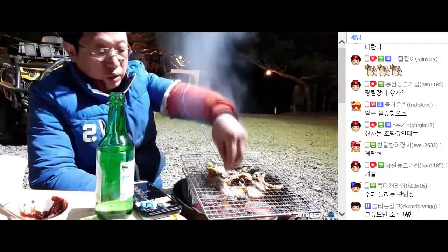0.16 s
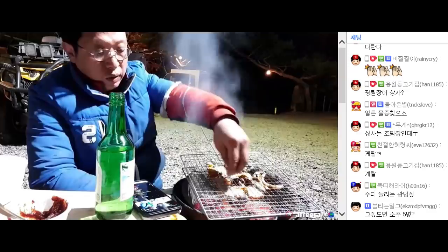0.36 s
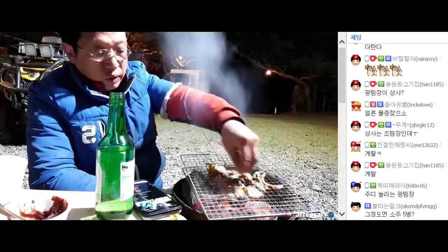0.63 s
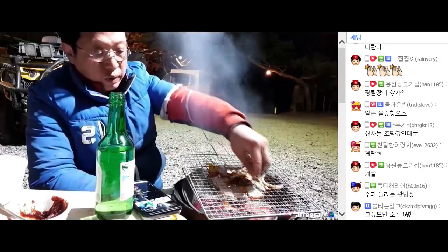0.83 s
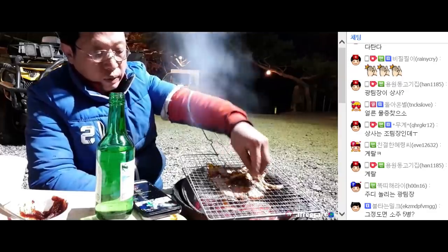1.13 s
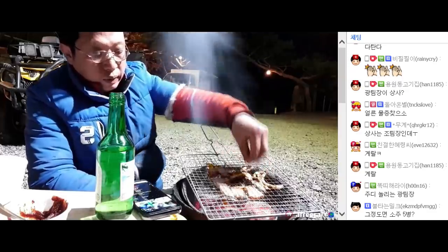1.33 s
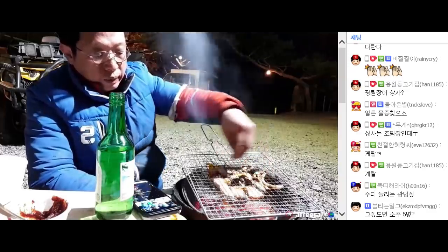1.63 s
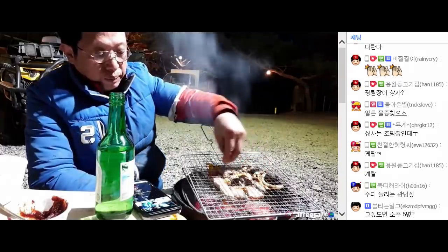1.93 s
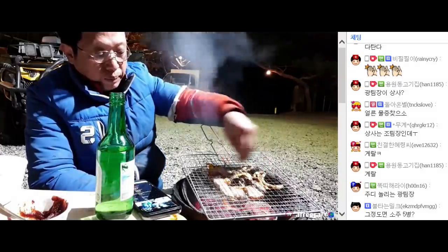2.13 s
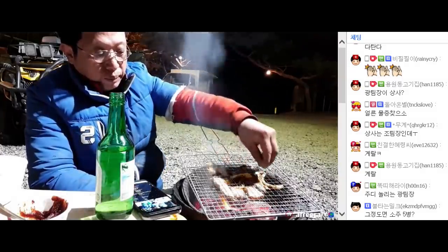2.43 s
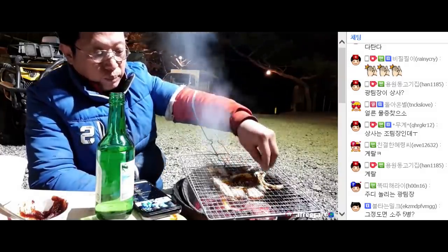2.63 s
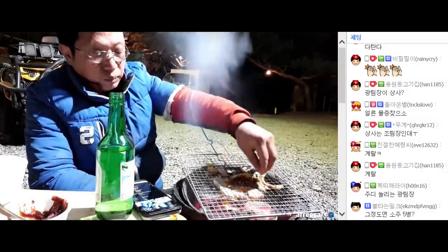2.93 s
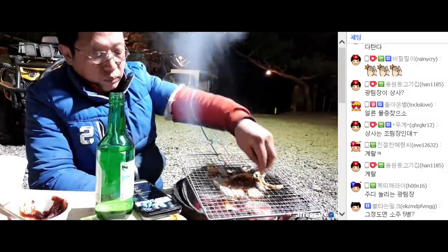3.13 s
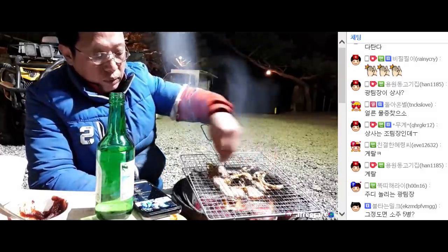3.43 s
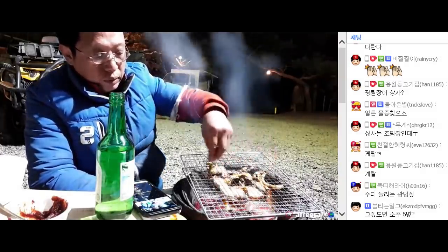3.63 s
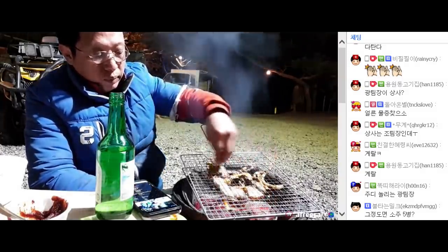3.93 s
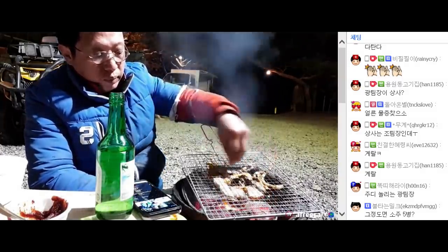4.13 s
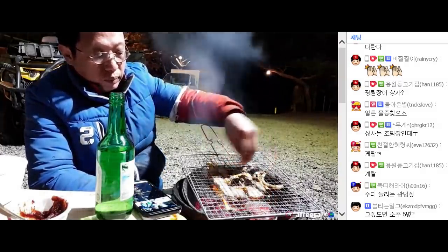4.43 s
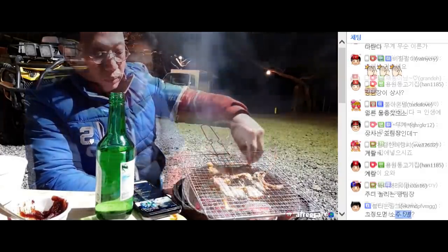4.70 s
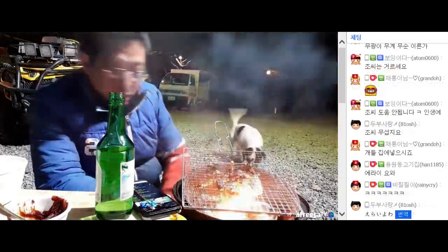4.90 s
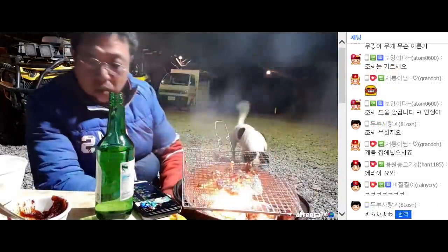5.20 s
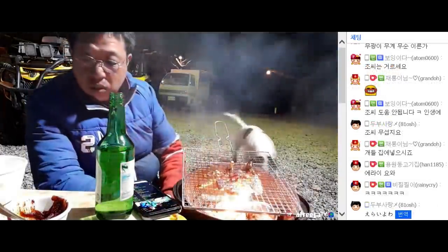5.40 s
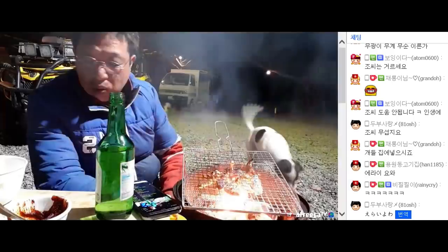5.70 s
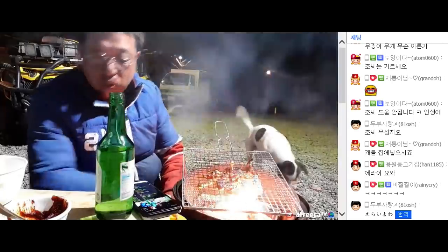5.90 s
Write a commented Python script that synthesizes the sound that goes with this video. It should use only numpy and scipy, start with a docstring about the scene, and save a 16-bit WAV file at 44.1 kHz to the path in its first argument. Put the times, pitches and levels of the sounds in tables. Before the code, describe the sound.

Outdoors at night, close to a charcoal grill: a bright, fluttering sizzle of fat over very low, soft air. At 0.1 s a small spit and a couple of muted ticks, then fairly calm fizzing. From 0.6 to 1.55 s a faint, narrow steam whistle swells and climbs slightly around the high treble, then cuts off. At 1.6 s a sharp snap, a hiss flare and a noticeable hand scuff; more snaps and rustles follow to 2.3 s. Hard cracks strike at 2.56 and 2.84 s, the latter followed by a hollow knock. Crackling thickens from 3 s, with a dull thump and crack at 3.49 s and the loudest snap at 3.77 s as the sizzle surges. Pops continue to 4.3 s, a brief lull, then a crack at 4.68 s, a low thump at 4.84 s and fine crackling. Paired snaps at 5.44 s, another at 5.72 s, rising sizzle to the end.

```python
"""Meat over charcoal at night

Fat sizzles close to the microphone: filtered noise and dense ticks that flare as drops flash to steam.
Steam whistles faintly as narrow-band noise; low draught and soft rustles of a hand are shaped noise.
Embers and fat burst as sharp filtered snaps, some with a hollow knock, among faint crackle and flurries.
Dull thumps are decaying sines; a short echo of scattered reflections follows the snaps and knocks."""
import sys
import numpy as np
from scipy import signal
from scipy.fft import rfft, irfft, next_fast_len
from scipy.io import wavfile
from scipy.ndimage import map_coordinates

SR = 44100
rng = np.random.default_rng(int(sys.argv[2]) if len(sys.argv) > 2 else 0)


def master_out(mix):
    """Clip the mix to full scale and print it as 16-bit PCM to the path in sys.argv[1]."""
    frames = np.transpose(np.atleast_2d(mix))
    ceiling = np.clip(frames, -1, 1)
    pcm = np.round(ceiling * 32767).astype(np.int16)
    wavfile.write(sys.argv[1], SR, pcm)


N = 267069
BURST_SAMPLES = SR // 20
SNAP_WINDOW_SAMPLES = SR // 200  # 5 ms


def amp(db):
    """Decibels to gain."""
    return 10 ** (np.asarray(db) / 20)


def unit(x):
    """Scale to rms 1."""
    return x / np.sqrt(np.mean(x ** 2) + 1e-20)


def along(points, hz):
    """Interpolate (frequency [Hz], value) points on a log frequency axis."""
    point_hz, values = np.transpose(points)
    return np.interp(np.log(hz + 1), np.log(point_hz + 1), values)


def curve(rows):
    """Interpolate (time [s], value) rows to one value per sample."""
    time_s, values = np.transpose(rows)
    return np.interp(np.arange(N) / SR, time_s, values)


def wobble(knots_per_s):
    """Smooth random curve through normally distributed knots."""
    knots = rng.standard_normal(int(N * knots_per_s / SR) + 4)
    return map_coordinates(knots, [np.arange(N) * knots_per_s / SR])


def held(start_s, length_s, attack_s, t60_s):
    """Envelope with exponential attack, hold and decay."""
    t = np.maximum(np.arange(N) / SR - start_s, 0)
    attack = 1 - np.exp(-t / attack_s)
    return attack * amp(-60 * np.maximum(t - length_s, 0) / t60_s)


def coloured(x, tone, tilt_db_per_octave=0):
    """Minimum-phase filter to the tone, tilted about 4 kHz between 1 and 8 kHz."""
    m = 2 * next_fast_len(len(x))
    hz = np.fft.rfftfreq(m, 1 / SR)
    octaves = np.log2(np.clip(hz, 1000, 8000) / 4000)
    cepstrum = irfft(np.log(amp(along(tone, hz) + tilt_db_per_octave * octaves)))
    # fold the cepstrum onto positive time: causal response
    cepstrum[1:m // 2] *= 2
    cepstrum[m // 2 + 1:] = 0
    response = np.exp(rfft(cepstrum))
    return irfft(rfft(x, m) * response)[:len(x)]


def add(track, start_s, sound):
    """Mix a sound into the track, cut at the track end."""
    start = max(round(start_s * SR), 0)
    part = track[start:start + len(sound)]
    part += sound[:len(part)]


def ticks(rate_per_s, spread_db):
    """Impulses of random sign at random moments, a few much larger than the rest."""
    chance = rng.random(N)
    size = np.minimum(rng.exponential(size=N), 4)
    sign = rng.choice([-1, 1], N)
    return unit((chance < rate_per_s / SR) * amp(spread_db * size) * sign)


# draught strength: (time [s], level [dB])
RUMBLE_LEVEL = [(0, -64), (2.2, -64), (3.9, -64.5), (4.35, -68), (4.95, -64), (6.06, -61.5)]
# low air spectrum: (frequency [Hz], relative density [dB per Hz])
RUMBLE_TONE = [(15, -20), (35, -10), (60, -1), (90, -3), (140, 0.5), (220, -9.5), (400, -21), (1000, -57.5)]
RUMBLE_WANDER_DB = 0.9


def rumble():
    """Night air and draught: low noise wandering a little in level."""
    level = amp(curve(RUMBLE_LEVEL) + RUMBLE_WANDER_DB * wobble(4.27))
    return level * unit(coloured(rng.standard_normal(N), RUMBLE_TONE))


# hand movements: (time [s], length [s], scuff level [dB], air push level [dB])
HAND_MOVEMENTS = [(-0.03, 0.036, -54.5, -57.5), (0.265, 0.08, -70, -70), (0.852, 0.065, -67, -60.5),
                  (1.212, 0.041, -60.5, -71), (1.616, 0.088, -45.5, -54), (1.744, 0.14, -61.5, -60),
                  (1.962, 0.08, -55.5, -70), (2.139, 0.15, -53.5, -56), (3.352, 0.21, -62.5, -72),
                  (3.806, 0.27, -63, -77), (4.665, 0.39, -59.5, -75), (5.16, 0.18, -64.5, -73),
                  (5.45, 0.13, -60, -71), (5.79, 0.096, -56, -63), (5.977, 0.08, -63.5, -58)]
# scuff spectrum: (frequency [Hz], relative density [dB per Hz])
SCUFF_TONE = [(30, -41), (70, 1), (170, -1.5), (400, 1), (700, -2.5), (1200, -13), (3000, -9.5),
              (8000, -59)]
RUSTLE_ATTACK_S, RUSTLE_T60_S, SCUFF_FLOOR_DB = 0.014, 0.56, -74.5


def rustle():
    """Handling: each movement adds uneven scuff noise and a low push of air."""
    scuff_power, push_power = amp(SCUFF_FLOOR_DB) ** 2, 0
    for start_s, length_s, scuff_db, push_db in HAND_MOVEMENTS:
        movement = held(start_s, length_s, RUSTLE_ATTACK_S, RUSTLE_T60_S)
        scuff_power = scuff_power + (amp(scuff_db) * movement) ** 2
        push_power = push_power + (amp(push_db) * movement) ** 2
    uneven_noise = rng.standard_normal(N) * amp(3.2 * wobble(90))
    scuffs = unit(coloured(uneven_noise, SCUFF_TONE))
    push = unit(coloured(rng.standard_normal(N), RUMBLE_TONE))
    return np.sqrt(scuff_power) * scuffs + np.sqrt(push_power) * push


# handling and air on the microphone:
# (time [s], level before the common gain [dB], frequency [Hz], t60 [s])
THUMPS = [(0.013, -35.5, 110, 0.048), (1.593, -21.5, 620, 0.0073), (1.671, -34, 340, 0.023),
          (1.6854, -31.5, 180, 0.055), (1.969, -22.5, 353, 0.012), (2.871, -37, 428, 0.051),
          (3.39, -39, 131, 0.029), (3.4778, -31, 332, 0.017), (3.489, -9.5, 117, 0.0086),
          (3.775, -38, 138, 0.026), (4.8401, -20, 100, 0.011), (5.836, -40, 455, 0.023)]
THUMP_GAIN_DB = 4.5


def thumps():
    """Dull pushes: softly started, exponentially decaying sines."""
    track = np.zeros(N)
    t = np.arange(BURST_SAMPLES) / SR
    for start_s, level_db, hz, t60_s in THUMPS:
        soft_start = 1 - np.exp(-2 * hz * t)
        decay = amp(level_db + THUMP_GAIN_DB - 60 * t / t60_s)
        add(track, start_s, -decay * soft_start * np.sin(2 * np.pi * hz * t))
    return track


STEAM_START_S, STEAM_END_S, STEAM_ATTACK_S, STEAM_T60_S = 0.62, 1.56, 0.05, 0.1
STEAM_START_HZ, STEAM_TOP_HZ, STEAM_RISE_HZ_PER_S = 4290, 4690, 540
STEAM_START_DB, STEAM_RISE_DB_PER_S = -71.5, 9


def steam():
    """Steam through a crack in the meat: swelling narrow-band noise climbing to a top pitch."""
    age_s = np.clip(np.arange(N) / SR, STEAM_START_S, STEAM_END_S) - STEAM_START_S
    pitch_hz = np.minimum(STEAM_START_HZ + STEAM_RISE_HZ_PER_S * age_s, STEAM_TOP_HZ)
    phase = 2 * np.pi * np.cumsum(pitch_hz) / SR
    # random quadrature modulation: faster knots widen the band
    core = wobble(260) * np.sin(phase) + wobble(210) * np.cos(phase)
    skirt = wobble(900) * np.sin(phase) + wobble(970) * np.cos(phase)
    jet = held(STEAM_START_S, STEAM_END_S - STEAM_START_S, STEAM_ATTACK_S, STEAM_T60_S)
    level = amp(STEAM_START_DB + STEAM_RISE_DB_PER_S * age_s)
    return jet * level * unit(core + amp(-3) * skirt)


# boiling strength: (time [s], level [dB])
SIZZLE_LEVEL = [(0, -65), (0.3, -61.5), (0.62, -63.5), (0.9, -59), (1.25, -57.5), (1.55, -63.5), (1.9, -61),
                (2.6, -58), (3.15, -63.5), (3.72, -55), (4.38, -57), (4.6, -64), (4.8, -56.5), (5.33, -58),
                (6.06, -53.5)]
# boiling fat spectrum: (frequency [Hz], relative density [dB per Hz])
SIZZLE_TONE = [(300, -12.5), (1200, -7.5), (2200, -4), (3200, -3.5), (4500, 3.5), (5400, 3.5), (6300, 2.5),
               (7600, 6.5), (8600, -3.5), (9500, -2), (9900, -28), (12000, -21), (13400, -37), (14200, -55)]
# drops flashing to steam on the coals: (time [s], length [s], hiss level [dB])
SPITS = [(0.042, 0.1, -52.5), (0.407, 0.087, -59), (1.576, 0.11, -54.5), (2.57, 0.13, -63),
         (4.684, 0.08, -55), (5.74, 0.06, -57)]
SPIT_ATTACK_S, SPIT_T60_S = 0.005, 0.29


def sizzle():
    """Boiling fat: hiss and the fizz of bursting bubbles, flaring where drops land."""
    flare_power = 0
    for start_s, length_s, hiss_db in SPITS:
        flare = amp(hiss_db) * held(start_s, length_s, SPIT_ATTACK_S, SPIT_T60_S)
        flare_power = flare_power + flare ** 2
    level = np.sqrt(amp(curve(SIZZLE_LEVEL)) ** 2 + flare_power)
    hiss = rng.standard_normal(N)
    fizz = amp(-5.5) * ticks(rate_per_s=900, spread_db=7)
    flutter = amp(1.7 * wobble(35))
    return level * flutter * unit(coloured(hiss + fizz, SIZZLE_TONE))


# snap spectrum: (frequency [Hz], relative density [dB per Hz])
SNAP_TONE = [(100, -33.5), (1000, -16), (1400, -11), (2000, -2), (2900, -6), (4000, -5), (5300, 0.5),
             (6300, -8), (7500, 3), (8200, -4.5), (8700, -18.5), (9400, -10), (9900, -41), (11500, -27),
             (16000, -54)]
CRACKLE_PER_S, CRACKLE_RMS_DB, CRACKLE_SPREAD_DB = 5.7, -75.5, 0.5


def crackle():
    """Embers: sparse faint ticks with the snap spectrum."""
    return amp(CRACKLE_RMS_DB) * unit(coloured(ticks(CRACKLE_PER_S, CRACKLE_SPREAD_DB), SNAP_TONE))


# fat meeting the coals: (centre time [s], full width at 1/e [s], level [dB])
FLURRIES = [(0.121, 0.047, -53), (2.35, 0.074, -56.5), (3.044, 0.045, -51), (3.639, 0.095, -53.5),
            (4.13, 0.1, -58), (4.945, 0.59, -58), (5.794, 0.087, -54.5)]


def flurries():
    """Fat on the coals: bell-shaped swells of densely packed tiny snaps."""
    t = np.arange(N) / SR
    swell = 0
    for centre_s, width_s, level_db in FLURRIES:
        swell = swell + amp(level_db) * np.exp(-(2 * (t - centre_s) / width_s) ** 2)
    snaps = ticks(rate_per_s=170, spread_db=1.5)
    return swell * unit(coloured(snaps, SNAP_TONE))


def burst(tone, tilt_db_per_octave, splinter_db, t60_s):
    """Small crack, main break and decaying splinter noise; total energy is 0 dB over 5 ms."""
    t = np.arange(BURST_SAMPLES) / SR
    splinter_envelope = amp(-60 * t / t60_s) * (1 - np.exp(-t / 0.001))
    force = rng.standard_normal(BURST_SAMPLES) * splinter_envelope
    force *= amp(splinter_db) / np.linalg.norm(force)
    force[0] += 0.3
    force[round(0.0004 * SR)] -= 1
    sound = coloured(force, tone, tilt_db_per_octave)
    return sound / np.linalg.norm(sound) * np.sqrt(SNAP_WINDOW_SAMPLES)


# louder bursts of ember and fat:
# (time [s], snap level over 5 ms [dB], brightness [dB per octave], knock level over 5 ms [dB])
POPS = [(0.1001, -44.5, 3, -39.5), (0.119, -45, -6.5, -43.5), (0.2887, -50.5, 4.5, -74),
        (0.3597, -51, 2, -65), (1.5897, -24.5, -3, -36.5), (1.7358, -31.5, 2.5, -51),
        (1.7834, -37, 1.5, -52), (1.9323, -49, 3.5, -68), (1.9707, -37.5, -5, -43), (2.1744, -34, -1, -47),
        (2.2603, -43.5, 1.5, -63), (2.313, -43.5, -2.5, -49), (2.347, -42, 1.5, -63),
        (2.362, -44.5, 2, -63), (2.394, -44, 3, -65), (2.451, -34, 1.5, -53), (2.4858, -49, -3, -55),
        (2.5584, -23.5, 1, -40), (2.6567, -34, 2, -57.5), (2.839, -24, 2.5, -47), (2.87, -33, -6.5, -30.5),
        (3.0089, -41.5, 5.5, -60.5), (3.085, -44, 2.5, -69), (3.1766, -40, 1.5, -60), (3.1858, -38, 0, -59),
        (3.2334, -40, 3, -59), (3.3099, -37.5, 4, -60.5), (3.4164, -35.5, 10, -53),
        (3.4217, -44, -2.5, -64), (3.4765, -26, -9.5, -29), (3.4905, -20.5, 2, -34), (3.6232, -44, 8, -70),
        (3.6506, -32.5, 3.5, -51.5), (3.722, -45.5, 4, -66), (3.774, -17, 0.5, -31.5),
        (3.7795, -25, 17, -65), (3.8641, -43.5, -9.5, -44), (3.9644, -27, 0.5, -53),
        (4.0385, -36.5, -1, -56.5), (4.056, -36.5, 4, -63), (4.108, -24.5, 1.5, -55),
        (4.1584, -38, 0.5, -57), (4.1851, -31.5, 1, -76), (4.2308, -31.5, 7.5, -58),
        (4.247, -39.5, 0.5, -69), (4.281, -42.5, 19, -82), (4.6832, -22.5, 2, -42.5),
        (4.742, -37.5, 2, -50.5), (4.8028, -41, 2.5, -71), (4.8408, -42, -2.5, -45),
        (4.9117, -41, 0.5, -53), (4.938, -43, 21, -45), (5.1556, -48.5, -6, -66), (5.433, -25, 1.5, -55),
        (5.4483, -22.5, 1.5, -45.5), (5.5047, -37.5, -1.5, -59), (5.5342, -41, 1, -59),
        (5.564, -45.5, -3.5, -51.5), (5.6343, -42, -0.5, -66), (5.7237, -27, 3, -49),
        (5.7858, -40.5, -2.5, -60), (5.7948, -44, -6, -50), (6.015, -48.5, 6, -74)]
# grill bowl spectrum: (frequency [Hz], relative density [dB per Hz])
KNOCK_TONE = [(60, -8.5), (200, -8.5), (350, -10.5), (500, 3), (700, 0.5), (1000, -11.5), (1700, -7.5),
              (3000, -19), (8000, -66)]


def pops():
    """Bursts: a bright snap plus a knock in the hollow of the grill bowl."""
    track = np.zeros(N)
    for start_s, snap_db, tilt_db_per_octave, knock_db in POPS:
        snap = amp(snap_db) * burst(SNAP_TONE, tilt_db_per_octave, splinter_db=0, t60_s=0.009)
        knock = amp(knock_db) * burst(KNOCK_TONE, 0, splinter_db=-4.0, t60_s=0.028)
        add(track, start_s, snap + knock)
    return track


# echo decay: (frequency [Hz], t60 [s])
ECHO_T60 = [(100, 0.37), (700, 0.07), (2000, 0.2), (5000, 0.18), (12000, 0.12)]
ECHO_DB = -8  # against the direct sound


def echo(x, delay_s, grain_db, first_db, count=20):
    """Delayed sparse reflections with frequency-dependent decay, redrawn for each block of input."""
    wet = np.zeros(N)
    step = N // count + 1
    tail_samples = SR // 3
    for start in range(0, N, step):
        reflections = rng.standard_normal(tail_samples) * (rng.random(tail_samples) < 0.06)
        hz, t, spectrum = signal.stft(reflections, SR, nperseg=256)
        early_db = first_db * np.exp(-t / 0.0037)  # nearest surfaces answer most strongly
        uneven_db = grain_db * rng.standard_normal(len(t))
        decay_db = -60 * t / along(ECHO_T60, hz)[:, None]
        tail = signal.istft(spectrum * amp(early_db + uneven_db + decay_db), SR, nperseg=256)[1]
        tail /= np.linalg.norm(tail)
        add(wet, start / SR + delay_s, signal.fftconvolve(x[start:start + step], tail))
    return wet


def scene():
    """Snaps, knocks and their echo over the unechoed sounds."""
    background = rumble() + rustle() + thumps() + steam() + sizzle()
    direct = crackle() + flurries() + pops()
    wet = amp(ECHO_DB) * echo(direct, delay_s=0.011, grain_db=3.5, first_db=6.5)
    return (background + direct + wet)[None]


BASS_HZ, TOP_HZ = 22, 16500


def record(dry):
    """Microphone: second-order bass loss and a sharp upper band limit."""
    m = next_fast_len(N + SR // 2)
    hz = np.fft.rfftfreq(m, 1 / SR)
    bass_loss = (1j * hz / (BASS_HZ + 1j * hz)) ** 2
    return irfft(rfft(dry, m) * bass_loss * (hz < TOP_HZ), m)[..., :N]


dry = scene()
out = record(dry)
master_out(out)
```